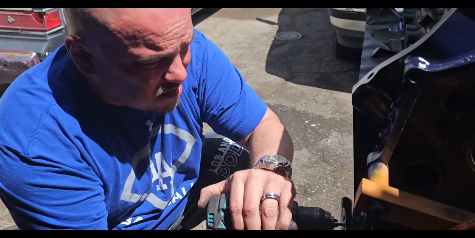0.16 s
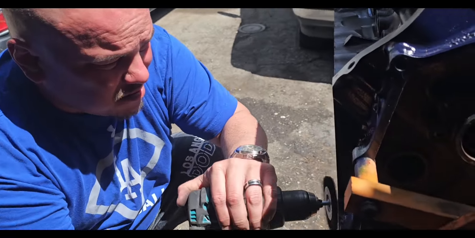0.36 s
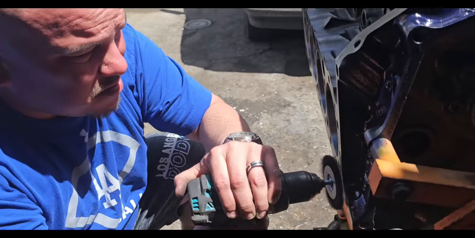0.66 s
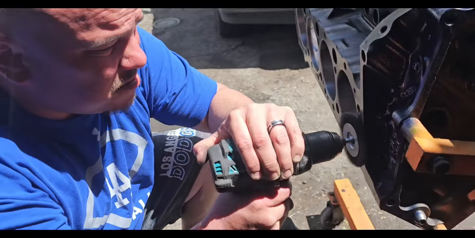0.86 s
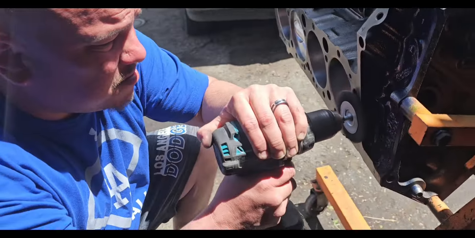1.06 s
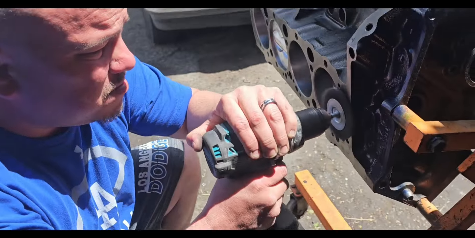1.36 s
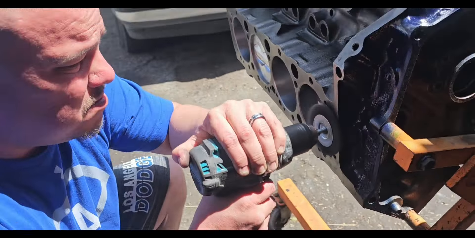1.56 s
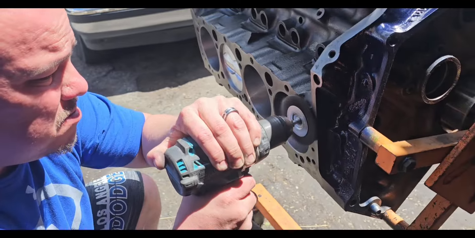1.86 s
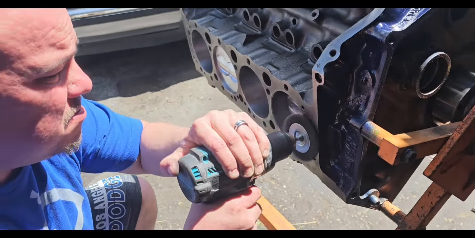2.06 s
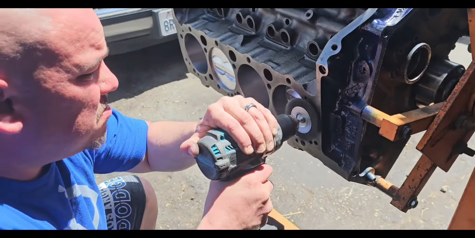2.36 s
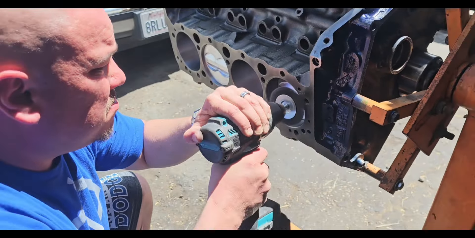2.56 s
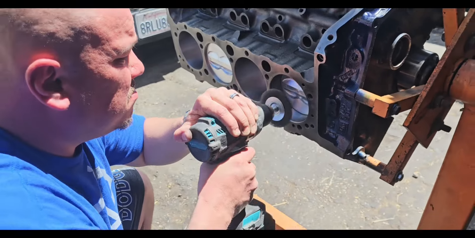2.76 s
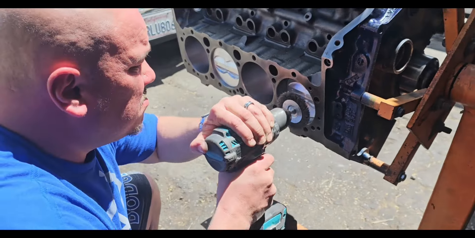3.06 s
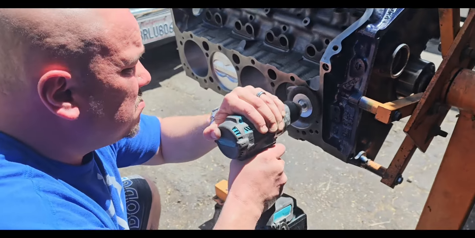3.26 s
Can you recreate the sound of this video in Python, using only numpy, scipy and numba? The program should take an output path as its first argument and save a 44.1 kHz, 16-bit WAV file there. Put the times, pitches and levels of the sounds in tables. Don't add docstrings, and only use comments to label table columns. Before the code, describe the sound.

A cordless drill whines steadily as its wire wheel scrapes an iron engine block outdoors, close to a stereo camera microphone; near the end it rattles to a stop, clacks and spins up again.

```python
import sys
import numpy as np
from scipy import signal
from scipy.fft import rfft, irfft
from scipy.io import wavfile
from scipy.ndimage import uniform_filter1d
from numba import njit

SR = 44100
rng = np.random.default_rng(int(sys.argv[2]) if len(sys.argv) > 2 else 0)


def output_pcm(signal):
    pcm = np.clip(np.atleast_2d(signal).T, -1, 1) * 32767
    wavfile.write(sys.argv[1], SR, np.round(pcm).astype(np.int16))


def attenuation_scalar(level_db):
    decades = np.asarray(level_db, float) / 20
    return 10 ** decades


N = 149940
t = np.arange(N) / SR
SIDES = np.array([[1], [-1]])

RELEASE_S, STOP_S, START_S, ENGAGE_S = 2.965, 3.195, 3.262, 3.277
FREE_HZ, TEETH, GEAR_RATIO = 459, 23, 13.6

# [start_s, wheel_pressure_db, pole_hum_db, planet_whine_db, bore_hz, bore_extra_db]
LOAD = [(0.0, -26, -36, -42, 3900, -2), (0.1, -27, -87, -46, 4020, -0.5), (0.19, -28, -47, -44, 3900, 6.5),
        (0.3, -27, -32, -46, 4030, 4.5), (0.43, -25.5, -31.5, -36, 4050, 3.5),
        (0.75, -25, -31.5, -35, 3910, 5), (0.93, -23.5, -35.5, -47, 3800, 6),
        (1.15, -23, -42.5, -39, 3940, -2.5), (1.53, -23.5, -39, -35, 3690, 2),
        (1.77, -23, -36, -34, 3600, 1), (2.18, -23, -36, -34.5, 4030, -3),
        (2.33, -21.5, -41.5, -27, 4050, 2.5), (2.47, -25, -37.5, -40, 3920, -6.5),
        (2.56, -23, -33, -41, 3860, -2.5), (2.65, -23, -47, -51, 4010, -0.5),
        (2.74, -22, -47, -39, 3800, -7.5), (2.88, -26, -36.5, -52, 3750, -7),
        (2.95, -27, -42, -50, 3870, 0.5)]
# [start_s, mesh_hz]
PINION_MESH = [(0, 10510), (.2, 10475), (.45, 10475), (.68, 10438), (.9, 10465), (1.1, 10445),
               (1.25, 10455), (1.55, 10425), (1.75, 10450), (1.9, 10410), (2.17, 10452), (2.34, 10355),
               (2.52, 10455), (2.76, 10310), (2.87, 10455), (2.96, 10520)]
# [start_s, level_db]
RIM_BITES = [(.34, 3.5), (.44, 7), (.53, -2), (.58, 2), (.65, -2.5), (.69, 3), (.8, -1), (.985, -6),
             (1.03, 0.5), (1.28, -3), (1.41, 4), (1.58, 1), (1.7, -7), (1.78, 2), (1.95, 0), (2.08, 1),
             (2.25, 1)]
# [pitch_hz, density_db]
IRON_COLOUR = [(300, -75), (500, -17.5), (1500, -15.5), (2300, -9), (4000, -2.5), (6000, -5.5), (9000, -11),
               (16000, -11)]
# [pitch_hz, width_hz, gain_db]
BLOCK_RESONANCES = [(1102, 64, 8.5), (2300, 750, 2), (7780, 520, 5.5), (10290, 510, -12), (11300, 840, 4.5)]
# [shaft_multiple, level_db, left_minus_right_db, brake_rise_db, runup_rise_db]
SHAFT_TONES = [
    (0.996, -52.5, 4.5, 1, -5),
    (7.98, -39, 4, 22.5, 4.5),
    (11.46, -45, -7, 0, -2),
    (16, -44, -12, 5, 5.5),
    (34, -62, 0, -6, -7),
    (14.4, -58, -3, 29, -4),
]
MESH_DIPS = [.06, .21, .39, .71, .82, 1.15, 1.47, 1.79, 2.02, 2.31, 2.72, 2.865]
# [pitch_hz, density_db]
FAN_COLOUR = [(400, -36.5), (1000, -5.5), (2500, -1.5), (4000, 0.5), (7000, -3.5), (12000, -4),
              (16000, -8.5)]
# [start_s, peak_db, tooth_hz, housing_ring_db]
GEAR_CLACKS = [(3.0154, -12, 7000, -4), (3.0266, -16, 8200, -8), (3.0414, -5.5, 7600, -9),
               (3.0598, -9, 6620, -4), (3.0690, -18, 7500, -9), (3.0750, -16, 8900, -2),
               (3.0836, -19, 6240, -3), (3.0790, -16, 4050, -5), (3.0900, -15, 4000, -6),
               (3.104, -16, 2400, -1), (3.1072, -9.5, 6400, -7.5), (3.1226, -25, 4300, -4),
               (3.1327, -13, 1900, -5), (3.1372, -11.5, 6950, -7), (3.1432, -7.5, 8600, 0.5),
               (3.168, -16, 8250, -8), (3.1718, -15, 3300, 0), (3.1800, -27, 3500, -3),
               (3.1921, -5.5, 6270, 1), (3.1990, -16.5, 4600, -4), (3.2769, -6.5, 9150, 1.5),
               (3.2850, -16, 6500, -4), (3.2923, -13, 3600, -3.0)]
# [pitch_hz, level_db, t60_s]
HOUSING_MODES = [(2510, -2, 0.013), (4050, -0.5, 0.0094), (3400, -1.5, 0.011), (5070, 0.5, 0.0087),
                 (630, -20.5, 0.028)]
# [pitch_hz, density_db]
CRACK_COLOUR = [(200, -35), (900, -10.5), (2500, 2), (8000, -1), (12000, -7.5), (16000, -8)]
# [pitch_hz, density_db]
TRAFFIC_COLOUR = [(15, -43), (25, -13), (59, 5.5), (92, -1.5), (119, -5), (145, -2.5), (420, -2.5),
                  (550, -69), (920, -120)]
# [pitch_hz, density_db]
AIR_COLOUR = [(260, -44), (450, -7), (679, -15), (1220, -3.5), (2900, -1), (5370, -13), (15000, -24)]
# [start_s, level_db, pitch_hz, length_s]
CAMERA_BUMPS = [(.08, -48, 200, .02), (0.988, -47, 260, 0.023), (1.1, -47, 171, 0.033),
                (1.2, -47, 242, 0.042), (1.342, -46.5, 198, 0.044), (2.457, -33, 170, 0.0066),
                (2.465, -36, 213, 0.014), (2.487, -40, 190, 0.013), (2.492, -43, 90, 0.011),
                (3.238, -27.5, 92, 0.009), (3.25, -46, 120, 0.018)]
# [pitch_hz, share]
COMMON_SHARE = [(60, 0.86), (300, 0.93), (700, 1), (1400, 0.25), (3000, 0.36), (7000, 0.16), (15000, 0.3)]
# [pitch_hz, left_minus_right_db]
PORT_TILT = [(60, 0), (110, -2.5), (200, -0.5), (380, 0.5), (700, 0.5), (1290, 2), (2380, 1.5),
             (4400, -6.5), (8120, 2.5), (15000, 4)]
# [pitch_hz, lead_rad]
LEFT_LEAD = [(300, 0.15), (1000, 0.89), (1800, 4.83), (2500, 6.9), (4000, 7.38), (4500, 8.34), (8000, 12),
             (16000, 22.9)]


def shaft():
    brake_bend, runup_s = 1.6, 0.038
    stopping = np.clip((t - RELEASE_S) / (STOP_S - RELEASE_S), 0, 1)
    loaded = control(column=1, table=PINION_MESH) / TEETH * (1 - stopping ** brake_bend)
    return loaded + FREE_HZ * (1 - np.exp(-np.clip(t - START_S, 0, None) / runup_s))


def bristle_ticks(hz, tufts=6):
    ticks_per_s, spread_db, ring_s, wobble_db, patchy_db = 9000, 3, 0.0038, 0.5, 0.5
    n = np.arange(500)
    turn = 2 * np.pi * np.cumsum(hz) / SR / GEAR_RATIO
    paths = 0
    for _ in range(tufts):
        struck = rng.random(N) < ticks_per_s / tufts / SR
        ticks = struck * attenuation_scalar(spread_db * np.minimum(rng.exponential(size=N), 6))
        wobble = wobble_db * np.sin(turn + rng.random())
        ticks = ticks * np.sign(rng.standard_normal(N)) * attenuation_scalar(wobble + patchy_db * walk(12.0))
        ring = rng.standard_normal((3, len(n))) * np.exp(-n / SR / ring_s)
        paths = paths + signal.oaconvolve(ticks[None], ring, axes=1)[:, :N]
    return colour(ports(paths[0], paths[1:]), IRON_COLOUR, BLOCK_RESONANCES)


def scrape(hz):
    brake_db, brake_fade_db, restart_db, bite_s = -19.5, -8, -25, 0.025
    bore_width_hz, bore_db = 514.0, 2.5
    slip = np.clip((t - RELEASE_S - 0.03) / 0.015, 0, 1)
    braking = brake_db + brake_fade_db * (t - RELEASE_S) / (STOP_S - RELEASE_S)
    pressed = control(column=1) * (1 - slip) + braking * slip
    db = np.where(t < STOP_S, pressed, restart_db - 20 * (t - ENGAGE_S))
    bites = sum(bite_db * np.exp(-((t - at) / bite_s) ** 2) for at, bite_db in RIM_BITES)
    moving = (t < STOP_S) | (t > ENGAGE_S)

    iron = bristle_ticks(hz)
    bore = np.array([svf(side, control(column=4), bore_width_hz) for side in iron])
    treble = np.array([svf(side, 13000 + 0 * t, 11000.0) for side in iron])
    iron = iron - 0.87 * slip * treble
    ring_db = bore_db - 7.6 * slip + control(column=5) + bites + 0.8 * walk(19)
    chatter_db = 1.1 * slip * (t < STOP_S) * walk(90)
    wheel_db = db + 3.5 + 0.2 * walk(6.87) + chatter_db
    return level(iron + attenuation_scalar(ring_db) * bore, 0) * attenuation_scalar(wheel_db) * moving


def whines(hz):
    groan_s, groan_rise_s, groan_fall_s = 3.006, 0.012, 0.06
    turn = 2 * np.pi * np.cumsum(hz) / SR
    groan = np.exp(-((t - groan_s) / np.where(t < groan_s, groan_rise_s, groan_fall_s)) ** 2)
    free = np.clip((t - RELEASE_S) / 0.1, 0, 1)
    engaged = t > ENGAGE_S

    rows = []
    hum_fade_db = -6 * np.clip((t - 2.27) / 0.15, 0, 1)
    for k, db, pan, brake, runup in SHAFT_TONES:
        tone_db = db + hum_fade_db * (k < 2) + brake * groan
        rows.append((k, tone_db + np.where(engaged, runup, -10 * free), pan))
    mesh_db = -35 - 8 * sum(np.exp(-((t - at) / 0.031) ** 2) for at in MESH_DIPS)
    rows.append((TEETH, np.where(engaged, -45, mesh_db - 40 * free), 4))
    flutter_db = 2.2 * np.sin(turn / GEAR_RATIO + 0.5 * walk(6.14))
    rows.append((4, control(column=2) + 0.98 - 25 * free + flutter_db, 1))
    planet_db = control(column=3) - 0.13 + 2 * walk(22)
    rows.append((10.175, planet_db + np.where(engaged, 4, -15 * free), -2))

    out = 0
    roughness = 1 + 7 * np.clip((t - groan_s) / 0.15, 0, 1)
    for k, db, pan in rows:
        jitter = np.cumsum(walk(150)) * 3e-4 * roughness * (1 + k / 4)
        phase = k * turn + jitter + 6 * rng.random() + SIDES * (0.5 + 0.21 * walk(4.0))
        waver_db = 1.56 * walk(45) + SIDES * (pan / 2 + 1.05 * walk(3.0))
        out = out + attenuation_scalar(db + waver_db) * np.sqrt(2) * np.sin(phase)
    return out * np.clip(hz / 250, 0, 1) ** 2 + switch_tone()


def switch_tone():
    on = (t > 3.254) * (t < ENGAGE_S)
    return attenuation_scalar(-37 + 4.6 * SIDES) * np.sin(2 * np.pi * 7900 * t + 1.7 * walk(410)) * on


def fan(hz):
    air = rng.standard_normal((3, N))
    hiss = colour(ports(air[0], air[1:]), FAN_COLOUR)
    treble = np.array([svf(side, 12500 + 0 * t, 8000.0) for side in hiss])
    hiss = hiss - 1.8 * np.clip(1 - hz / FREE_HZ, 0, 0.6) * treble
    return hiss * attenuation_scalar(-27 + 0.5 * walk(5.6)) * (hz / FREE_HZ) ** 1.04


def clacks():
    crack_s, crack_db, rattle_s, rattle_db, strike_s = 0.00096, -2.5, 0.0029, -8.5, 0.00069
    out, s = np.zeros((3, N)), np.arange(2200) / SR
    grit = np.array([colour(v, CRACK_COLOUR) for v in rng.standard_normal((3, N))])
    chances = rng.standard_normal((len(GEAR_CLACKS), 3, 12))
    for (at, db, hz, housing_db), chance in zip(GEAR_CLACKS, chances):
        i = int(at * SR)
        crack = attenuation_scalar(crack_db - housing_db) * np.exp(-s / crack_s)
        rattle = attenuation_scalar(rattle_db) * np.exp(-s / rattle_s)
        blow = grit[:, i:i + len(s)] * (crack + rattle)
        modes = [(f, g + housing_db, t60) for f, g, t60 in HOUSING_MODES] + [(hz, 0, 0.006)]
        for k, (f, g, t60) in enumerate(modes):
            ring = np.sin(2 * np.pi * f * s + 3 * chance[:, [k + 6]])
            blow += attenuation_scalar(g + 2.0 * chance[:, [k]]) * ring * np.exp(-np.log(1000) * s / t60)
        out[:, i:i + len(s)] += attenuation_scalar(db - 4.0) * blow * np.minimum(s / strike_s, 1)
    return ports(out[0], out[1:])


def echo(drill):
    s = np.arange(8000) / SR
    tail = rng.standard_normal((2, len(s))) * np.exp(-np.log(1000) * s / 0.17)
    tail = tail / np.sqrt(np.sum(tail ** 2, axis=1, keepdims=True))
    return attenuation_scalar(-7) * signal.fftconvolve(drill, tail, axes=1)[:, :N]


def yard():
    low, air = rng.standard_normal((2, 3, N))
    out = colour(ports(low[0], low[1:]), TRAFFIC_COLOUR) * attenuation_scalar(-52 + 1.25 * walk(5.65))
    out = out + colour(air[1:], AIR_COLOUR) * attenuation_scalar(-45)
    out = out + attenuation_scalar(-57 + 1.4 * walk(7.96)) * np.sin(2 * np.pi * 120 * t)
    for at, db, hz, length in CAMERA_BUMPS:
        thump = np.cos(2 * np.pi * hz * (t - at)) * np.exp(-((t - at) / length * 2) ** 2)
        out = out + attenuation_scalar(db - 2.0 * SIDES) * thump
    return out


def ports(common, own):
    hz = np.arange(N // 2 + 1) * SR / N
    share = np.clip(along(COMMON_SHARE, hz), 0, 1)
    lead = np.exp(0.5j * along(LEFT_LEAD, hz) * SIDES)
    mix = np.sqrt(share) * rfft(common) * lead + np.sqrt(1 - share) * rfft(own)
    return irfft(mix * attenuation_scalar(SIDES * along(PORT_TILT, hz) / 2), N)


def level(x, db):
    return x * attenuation_scalar(db) / np.sqrt(np.mean(x ** 2))


def along(table, hz):
    table = np.array(table, float)
    return np.interp(np.log(hz + 1), np.log(table[:, 0]), table[:, 1])


def colour(x, table, resonances=()):
    hz = np.arange(N // 2 + 1) * SR / N
    db = along(table, hz) + sum(g / (1 + (2 * (hz - f) / w) ** 2) for f, w, g in resonances)
    return level(irfft(rfft(x) * attenuation_scalar(db), N), 0)


def walk(rate):
    k = int(SR / rate)
    steps = np.repeat(rng.standard_normal(N // k + 1), k)
    return 1.39 * uniform_filter1d(uniform_filter1d(steps, k), k)[:N]


def control(column, table=LOAD):
    table = np.array(table)
    return np.interp(t, table[:, 0], table[:, column])


@njit
def svf(x, hz, width):
    y, band, low = np.empty(len(x)), 0., 0.
    for i in range(len(x)):
        g, k = np.tan(np.pi * hz[i] / SR), width / hz[i]
        v = (band + g * (x[i] - low)) / (1 + g * (g + k))
        band, low, y[i] = 2 * v - band, low + 2 * g * v, k * v
    return y


def scene():
    hz = shaft()
    drill = scrape(hz) + fan(hz) + clacks()
    return drill + echo(drill) + whines(hz) + yard()


def band_limit(x):
    return signal.sosfilt(signal.butter(12, 16550, fs=SR, output="sos"), x)


def record(dry):
    top_cut = signal.ellip(8, 0.2, 60, 15400, fs=SR, output="sos")
    mix = signal.sosfilt(top_cut, dry)
    return band_limit(mix)


dry = scene()
out = record(dry)
output_pcm(out)
```